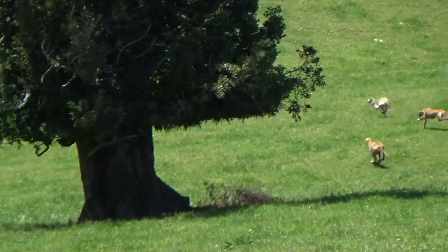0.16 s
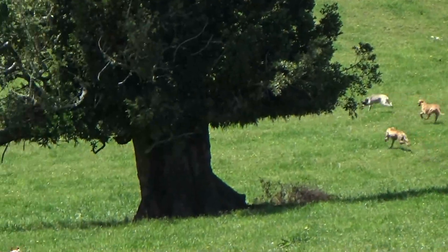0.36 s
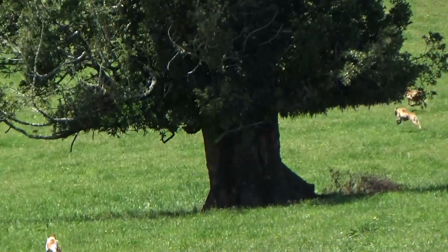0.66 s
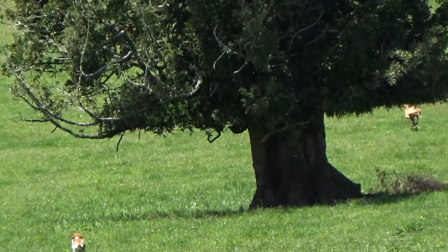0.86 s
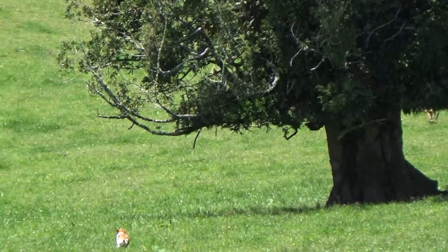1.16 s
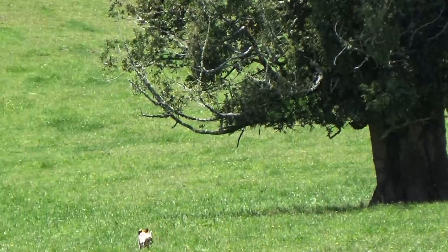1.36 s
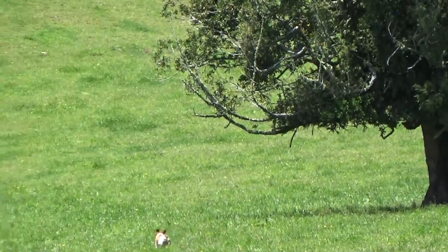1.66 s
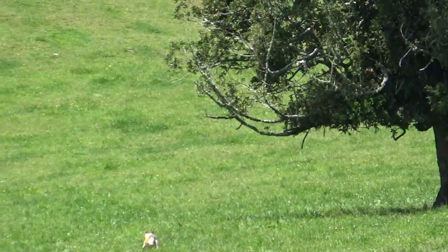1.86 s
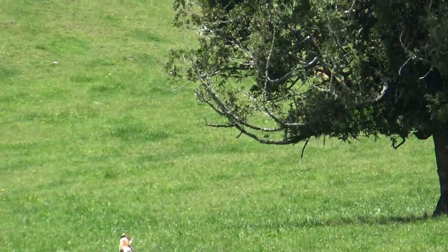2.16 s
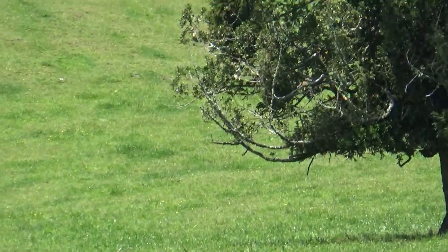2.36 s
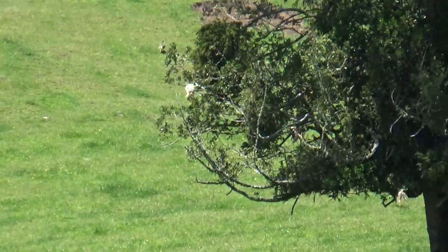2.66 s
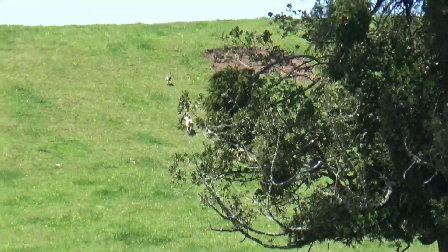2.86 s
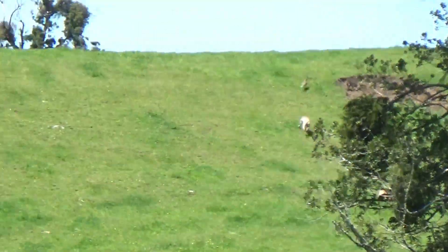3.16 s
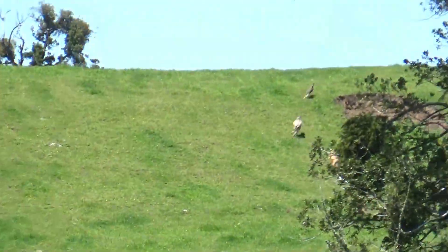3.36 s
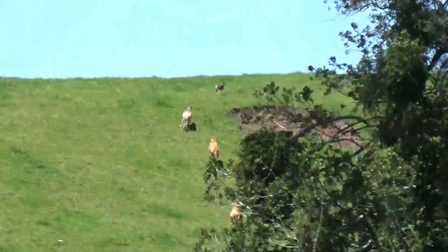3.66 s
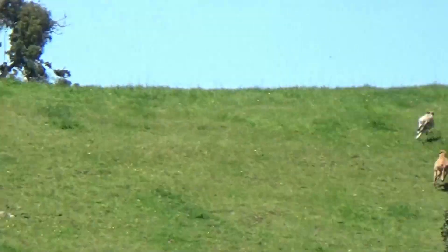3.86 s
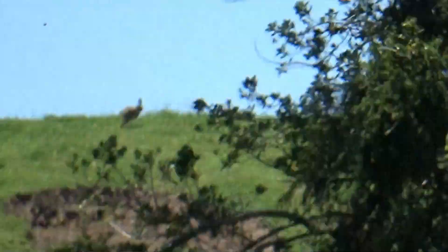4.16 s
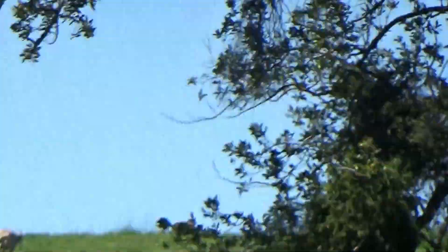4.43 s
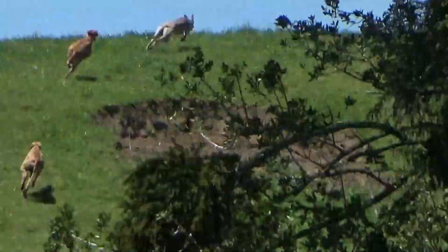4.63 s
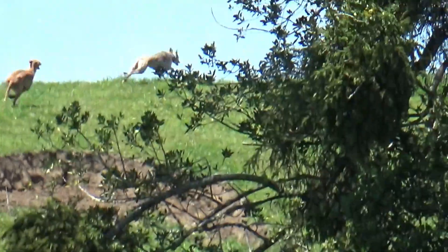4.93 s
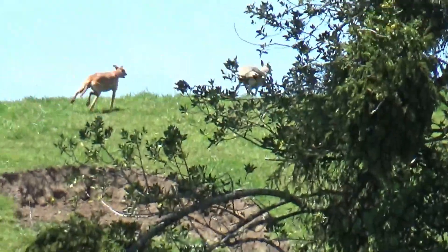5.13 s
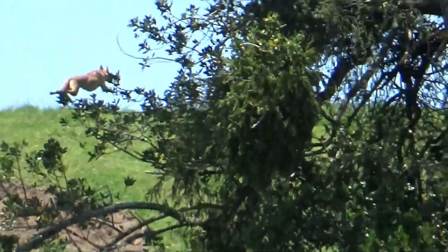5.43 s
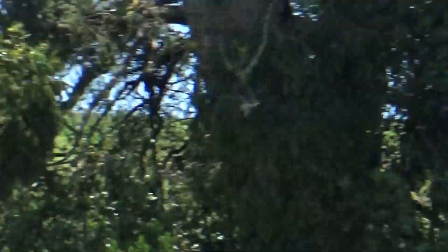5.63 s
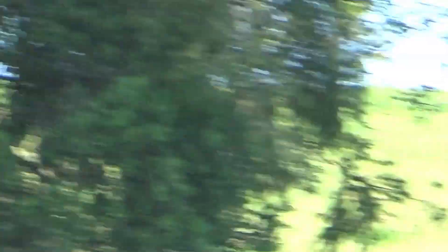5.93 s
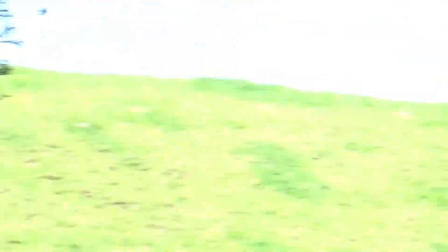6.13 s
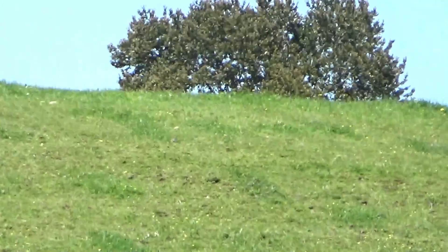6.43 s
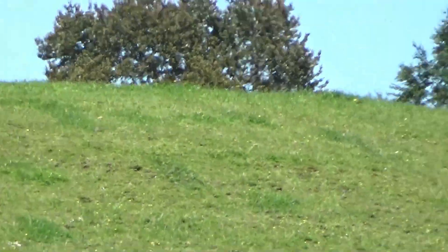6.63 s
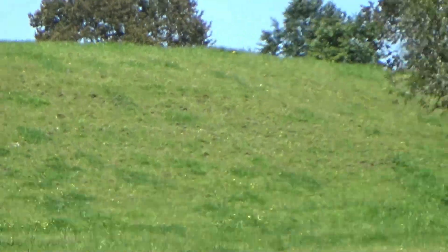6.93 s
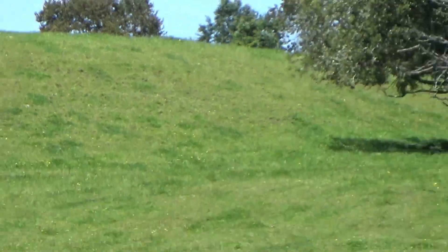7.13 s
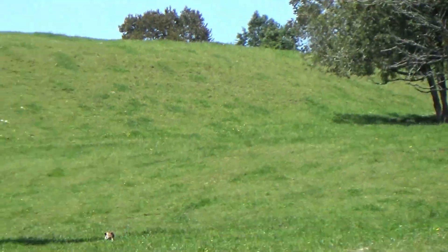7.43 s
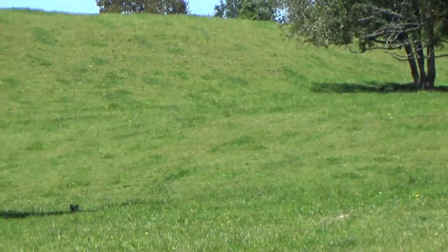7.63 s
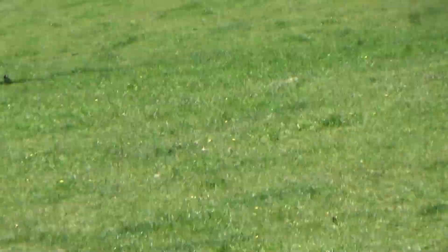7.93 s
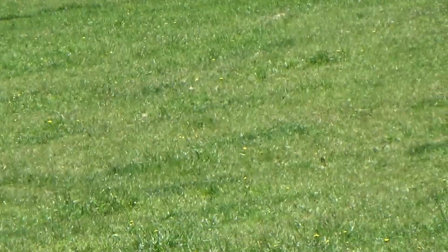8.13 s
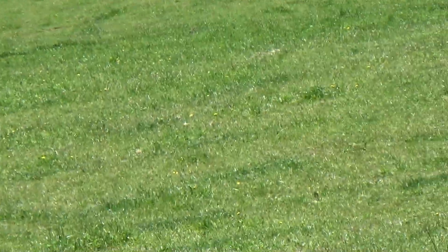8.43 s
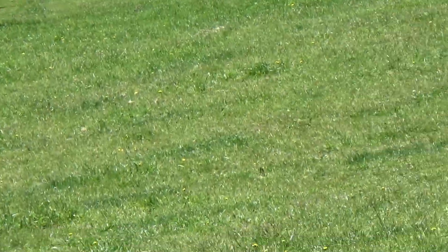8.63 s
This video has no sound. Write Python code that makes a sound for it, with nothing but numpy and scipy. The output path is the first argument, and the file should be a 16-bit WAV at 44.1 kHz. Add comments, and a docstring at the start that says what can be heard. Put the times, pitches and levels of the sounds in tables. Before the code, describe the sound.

A dog to the right whines in thin two-part cries while distant dogs yelp across an open hillside, with light camera handling clicks and cloth rustle.

```python
"""Dogs on a hill pasture, under faint outdoor air that lasts throughout.
At once a near dog, a little to the right, whines in two-part cries built from voice partials, and far dogs
yelp, their calls spread out by trees and slopes. Soon a hand-held camera ticks, as noise bursts ringing its
housing, then cloth brushes it as grainy hiss. The near dog whines again from about 4 s; near 6 s a small bird
chips in sliding whistles; far yelps are strongest just before 8 s and continue almost to the end."""
import sys
import numpy as np
from scipy import signal
from scipy.fft import rfft, irfft, next_fast_len
from scipy.io import wavfile
from scipy.ndimage import uniform_filter1d

SR = 44100
rng = np.random.default_rng(int(sys.argv[2]) if len(sys.argv) > 2 else 0)


def dump(signal):
    """Clip the signal to [-1, 1] and save it as 16-bit WAV at the path in sys.argv[1]."""
    limited = np.clip(np.atleast_2d(signal).T, -1, 1)
    pcm = np.round(limited * 32767).astype(np.int16)
    wavfile.write(sys.argv[1], SR, pcm)


N = 387638
TIME = np.arange(N) / SR
FREQ = np.fft.rfftfreq(N, 1 / SR)


def undb(db):
    """Turn decibels into a multiplying gain."""
    return 10 ** (np.asarray(db) / 20)


def unit(x):
    """Scale to an rms (average strength) of 1."""
    return x / np.sqrt(np.mean(x ** 2))


def at(points, hz, axis=1):
    """Read a table column between its points, along log frequency."""
    table = np.array(points, float)
    return np.interp(np.log(hz + 1), np.log(table[:, 0]), table[:, axis])


def shaped(gain):
    """Noise whose spectrum follows a function of frequency, rms 1."""
    n = next_fast_len(N, real=True)
    spectrum = rfft(rng.standard_normal(n)) * gain(np.fft.rfftfreq(n, 1 / SR))
    return unit(irfft(spectrum, n)[:N])


def noise(spectrum):
    """Noise coloured by a table of frequency and level, rms 1."""
    return shaped(lambda hz: undb(at(spectrum, hz)))


def walk(rate):
    """Smooth random wander, rms 1; a higher rate in Hz wanders faster."""
    return shaped(lambda hz: np.exp(-(hz / rate) ** 2))


def add(out, start, x):
    """Mix a sound in at a time in seconds."""
    i = max(int(start * SR), 0)
    out[i:i + len(x)] += x[:max(N - i, 0)]


def span(start, length, fade):
    """Time within a call, its places in the scene and its soft-edged gate."""
    t = np.arange(0, length, 1 / SR)
    i = np.clip(((start + t) * SR).astype(int), 0, N - 1)
    return t, i, np.clip(np.minimum(t, length - t) / fade, 0, 1)


def harmonics(hz, tract, count):
    """Partials at whole multiples of the pitch, each weighted by the throat's response where it lies."""
    k = np.arange(1, count + 1)[:, None]
    waves = np.sin(k * 2 * np.pi * np.cumsum(hz) / SR)
    return waves * undb(at(tract, k * hz)) * (k * hz < SR / 2)


def late(x, s):
    """The same sound a moment later."""
    return np.interp(TIME - s, TIME, x, left=0)


def absorb(x, edge_hz):
    """Air and grass take the treble from long paths."""
    return irfft(rfft(x) / (1 + (FREQ / edge_hz) ** 4), N)


def scatter(x, t60, delay, apart):
    """Diffuse return from foliage and slopes: a fading noise tail, partly different left and right."""
    t = np.arange(2 * SR) / SR
    envelope = undb(-60 * t / t60) * (1 - np.exp(-(t / delay) ** 2))
    mid, side = rng.standard_normal((2, len(t))) * envelope
    tails = unit(np.array([mid + apart * side, mid - apart * side])) / np.sqrt(len(t))
    return signal.fftconvolve(x[None], tails, axes=1)[:, :N]


# colour of the steady air (f/Hz, relative level/dB)
AIR_COLOUR = [(25, -27), (50, -19), (110, -9), (250, -6), (450, -4), (650, 1), (1000, -1), (1400, -5),
              (2700, -6), (3500, -7), (4500, -12), (9000, -15), (12500, -18), (15800, -23)]
# how alike the air is at left and right (f/Hz, likeness from 0 to 1)
AIR_LIKENESS = [(60, 0.86), (130, 0.9), (300, 0.69), (1400, 0.2), (3100, 0.34), (7000, 0.75), (12000, .98)]
# soft puffs of wind (t/s of the middle, width/s, level/dB)
PUFFS = [(3.717, 0.054, -72), (5.35, 0.064, -72), (5.8, 0.083, -77), (6.865, .04, -74)]
AIR_DB = -61.5  # the part of the air shared by both sides


def air(leaves_db=-72):
    """Steady outdoor noise, far leaves that swell at random, and a few low puffs of wind."""
    likeness = np.clip(at(AIR_LIKENESS, FREQ), 0, 1)
    # an opposite-signed part makes left and right differ
    side = irfft(rfft(noise(AIR_COLOUR)) * np.sqrt((1 - likeness) / (1 + likeness)), N)
    hush = (noise(AIR_COLOUR) + np.array([side, -side])) * undb(AIR_DB)
    swell = undb(2 * walk(3))
    leaf_noise = noise([(300, -62), (650, 10), (1000, 25.5), (2000, 1), (5000, -61)])
    leaves = leaf_noise * undb(leaves_db) * swell
    gusts = sum(undb(db) * np.exp(-((TIME - s) / width) ** 2) for s, width, db in PUFFS)
    wind = noise([(20, -8), (50, -8), (130, -2), (300, -47), (1500, -70)])
    return hush + leaves + gusts * wind


# strokes of a sleeve across the camera (t/s of the firmest moment, swell/s, fade/s, level/dB)
BRUSH_STROKES = [(2.859, 0.039, 0.38, -58), (3.363, 0.034, 0.062, -49), (3.7, 0.11, 0.34, -61),
                 (4.101, 0.058, 0.0077, -46)]
# colour of the cloth (f/Hz, relative level/dB)
CLOTH_COLOUR = [(500, -21), (1500, 4.5), (3000, -1.5), (5000, 0), (7000, 0.5), (9000, 2.5), (11000, -4),
                (15000, -21)]


def brushing(grain_db=3):
    """Each stroke swells and fades; fibres catch and let go, giving a grainy hiss."""
    pressure = np.zeros(N)
    for s, swell, fade, db in BRUSH_STROKES:
        pressure += undb(db) * np.exp(-np.maximum((s - TIME) / swell, (TIME - s) / fade))
    grain = undb(grain_db * walk(600))
    return pressure * unit(noise(CLOTH_COLOUR) * grain)


# ticks of the camera body under the fingers
# (t/s, peak level/dB before the overall gain, bass level/dB and treble level/dB before the colour offsets)
TICKS = [(1.319, -48.5, 11, -13), (2.343, -46.5, -1, -11), (2.394, -33.5, -17, -10.5),
         (3.514, -42.5, 0, -42), (3.653, -36, 0, -4), (3.732, -46, 4, -14), (3.752, -40.5, 1, -13),
         (3.778, -44.5, -5, -29), (3.927, -42.5, -14.5, -17), (4.123, -24, 3.5, -18.5),
         (4.498, -39, 7, -36), (6.611, -34, -6, -18.5), (7.129, -38.5, -4.5, -24), (7.269, -39, -9, -35),
         (7.293, -39, 7, -16), (7.633, -32, 5.5, -2.5), (7.658, -32, -9, -13), (7.673, -31.5, -2.5, -15),
         (7.701, -37.5, 3, -15), (7.729, -39, 4.5, -11), (7.801, -41, 0, -13), (7.816, -42, -3, -14),
         (7.895, -34.5, 5.5, -7.5), (7.904, -36.5, 3, -20), (8.045, -35, -10, -23),
         (8.073, -42.5, 9.5, -14), (8.23, -39, 16, -5)]
# ringing modes of the housing (f/Hz before detuning, time to fall 60 dB t60/s, relative level/dB)
HOUSING_MODES = [(695, 0.081, 2), (980, 0.038, 7), (1490, 0.0075, 16), (1750, 0.046, 15),
                 (2280, 0.011, 15.5), (3270, 0.0096, 19), (4300, 0.0076, 12.5), (6600, 0.0018, 22),
                 (8500, 0.0035, 19.5), (8640, 0.0023, -8.5)]
# colour of a finger's contact (f/Hz, relative level/dB)
CONTACT_COLOUR = [(80, -32), (300, -15), (600, -2), (3500, 2), (5000, 5.5), (9500, 9), (11500, -2),
                  (15000, -11)]


def ticking(push_s=0.0017, gain_db=2, crack_db=0, crack_t60=0.022):
    """Each slip of a finger is a brief scrape that rings the plastic housing."""
    out, t = np.zeros(N), np.arange(4096) / SR
    f = np.fft.rfftfreq(len(t), 1 / SR)
    for s, db, low_db, top_db in TICKS:
        push, crack = rng.standard_normal((2, len(t)))
        # the grip shifts the modes from touch to touch
        detune = 1 + .06 * rng.standard_normal(len(HOUSING_MODES))
        ring = np.zeros(len(t))
        for (hz, t60, mode_db), shift in zip(HOUSING_MODES, detune):
            ring += np.sin(2 * np.pi * hz * shift * t) * undb(mode_db - 60 * t / t60)
        tick = unit(signal.fftconvolve(ring, push * np.exp(-t / push_s))[:len(t)])
        tick = tick + undb(crack_db) * unit(crack * undb(-60 * t / crack_t60))
        # bass and treble vary from touch to touch
        balance = [(1200, low_db - 2.0), (3200, 0), (7500, top_db + 3.5)]
        colour = at(balance, f) + at(CONTACT_COLOUR, f)
        lead = 220  # samples of room before the tick, for the filter's spread
        tick = irfft(rfft(np.roll(tick, lead)) * undb(colour), len(t))
        peak = np.sqrt(uniform_filter1d(tick ** 2, size=88).max())  # loudest 2 ms
        add(out, s - lead / SR, tick / peak * undb(db + gain_db))
    return out


# a small bird's pairs of falling chips, high then low (t/s of the first chip, peak level/dB)
CHIPS = [(6.02, -63), (6.705, -69), (6.77, -63), (6.84, -61), (6.91, -64), (6.98, -65)]
CHIP_HIGH_HZ, CHIP_LOW_HZ, CHIP_GAP_S = 4400, 3400, 0.0386  # starting pitches; gap between starts


def chipping(length_s=0.025, fall=0.074):
    """Pairs of short whistles that slide down by a share of their pitch."""
    out, t = np.zeros(N), np.arange(0, length_s, 1 / SR)
    for s, db in CHIPS:
        for start, hz in (s, CHIP_HIGH_HZ), (s + CHIP_GAP_S, CHIP_LOW_HZ):
            phase = 2 * np.pi * np.cumsum(hz * (1 - fall * t / length_s)) / SR
            add(out, start, np.sin(phase) * np.sin(np.pi * t / length_s) * undb(db))
    return out


CLIMB, CLIMB_CURVE, CLIMB_DB = .16, 2.23, -15  # a yelp starts this share flat and this much softer
SWELL_CURVE = 1.22  # its level rounds off as it nears the break
FALL_CURVE, FALL_DB = 2.2, -14.5  # it holds its top, then drops ever faster in pitch


def arch(t, climb_s, fall_s, low_hz, high_hz, last_hz, low_db, high_db, low_overtones_db, high_overtones_db):
    """Pitch, level and overtones of a yelp: it swells up to the break, shifts, then sinks and fades."""
    early = np.clip(1 - t / climb_s, 0, 1)
    spent = np.clip((t - climb_s) / fall_s, 0, 1)
    broken = uniform_filter1d((t > climb_s) * 1., size=220)
    climbing = low_hz * (1 - CLIMB * early ** CLIMB_CURVE)
    falling = high_hz + (last_hz - high_hz) * spent ** FALL_CURVE
    hz = (1 - broken) * climbing + broken * falling
    db = low_db + (high_db - low_db) * broken + CLIMB_DB * early ** SWELL_CURVE + FALL_DB * spent
    return hz, db, low_overtones_db + (high_overtones_db - low_overtones_db) * broken


# far yelps climb, break (most often upwards) and fall away
# (t/s, climb/s, fall/s, f/Hz before the break, f/Hz after it, last f/Hz, level/dB before, level/dB after,
#  overtone level/dB before, overtone level/dB after); call levels are relative, before the overall gain
YELPS = [ (0, 0.12, .06, 983, 931, 870, -48, -54, 4.5, 2.5),
         (.52, 0.041, 0.04, 955, 960, 940, -66, -74.5, 13, 5),
         (.83, 0.15, 0.1, 970, 1181, 923, -52, -46.5, 6, -7),
         (1.71, 0.043, 0.022, 924, 928, 900, -49, -64.5, -7, 9),
         (1.774, 0.077, 0.089, 942, 1084, 834, -46.5, -48.5, 2, -2.5),
         (2.001, 0.066, 0.14, 915, 920, 878, -72, -74, 13.5, 11),
         (2.245, 0.027, 0.042, 925, 930, 903, -68.5, -63, 4, 1),
         (2.964, 0.058, 0.098, 925, 1152, 743, -51.5, -41.5, 11, 0),
         (3.564, .06, 0.1, 906, 1246, 790, -38, -47.5, -8, -5),
         (5.829, 0.094, 0.2, 1465, 1410, 1280, -57, -56.5, 3, -15),
         (6.179, .07, 0.17, 1540, 1477, 1265, -57, -58, -8, -7),
         (7.446, 0.089, 0.067, 1275, 1574, 1303, -39, -40.5, -4, 0),
         (7.815, .05, .118, 1194, 1647, 978, -31.5, -29, -10.5, -11.5),
         (8.136, 0.04, 0.17, 927, 1215, 1015, -52, -42, 11, -0.5),
         (8.46, 0.048, .04, 820, 816, 780, -60.5, -56, 12, -8)]
# open mouth heard through the distance (f/Hz, relative level/dB)
MOUTH = [(150, -57), (500, -47), (850, 2.5), (1650, -1.5), (2100, -1), (2600, 1), (3300, -11.5),
         (4500, -25.5), (7000, -30.5)]


def yelping(gain_db=2.5, rasp_db=-10.0):
    """Arched voices with a break and some breath noise; the pitch is shakiest as each yelp starts."""
    out, wobble, flutter, rasp = np.zeros(N), walk(230), walk(81), noise(MOUTH)
    for s, climb_s, fall_s, *voicing in YELPS:
        t, i, gate = span(s, climb_s + fall_s, fade=0.0055)
        hz, db, overtones_db = arch(t, climb_s, fall_s, *voicing)
        jitter = .015 + .03 * np.exp(-t / .04)
        partials = harmonics(hz * (1 + jitter * wobble[i]), MOUTH, count=7)
        voice = partials[0] + undb(overtones_db) * partials[1:].sum(0)
        hoarse = undb(rasp_db + overtones_db / 2) * rasp[i]
        add(out, s, (voice + hoarse) * gate * undb(db + gain_db + flutter[i]))
    return out


def place_far_dogs(yelp, hill_s=0.54, hill_db=-21):
    """Far calls arrive directly, through trees, off slopes, and as one dull echo from a hill."""
    trees = undb(-4) * scatter(yelp, t60=0.08, delay=0.0025, apart=0.2)
    slopes = undb(-10.5) * scatter(yelp, t60=2.4, delay=0.068, apart=0.28)
    hill = undb(hill_db) * late(absorb(yelp, edge_hz=2600), hill_s)
    return yelp + trees + slopes + hill


SCOOP, SCOOP_S, SCOOP_DB = 0.0707, 0.01227, -7.5  # a cry starts flat (share of its pitch) and soft
DIP_LEAD_S, DIP_WIDTH_S, DIP_DB = .032, .04, -5.5  # the voice sinks just before it restarts
PINCH_S, PINCH_DB = 0.0081, -4.5  # a brief extra loss of level just before the restart
SAG_DB, HUMP_DB = -1, 1  # the second part loses level overall, with a swell in its middle
DROP_S, DROP_HZ, DROP_DB, DROP_CURVE = .065, 772, -12.5, 1.6  # the end collapses, ever faster


def cry(t, first_s, length, open_hz, dip_hz, restart_hz, sagged_hz, first_db, second_db):
    """Pitch and level of a whine: scoop up, sink, restart higher, sag, collapse."""
    scoop = np.exp(-t / SCOOP_S)
    dip = np.exp(-((t - first_s + DIP_LEAD_S) / DIP_WIDTH_S) ** 2)
    sag = np.clip((t - first_s) / (length - DROP_S - first_s), 0, 1)
    drop = np.clip((t - length + DROP_S) / DROP_S, 0, 1) ** DROP_CURVE
    opening = open_hz * (1 - SCOOP * scoop) + (dip_hz - open_hz) * dip
    held = restart_hz + (sagged_hz - restart_hz) * sag + (DROP_HZ - sagged_hz) * drop
    first = t < first_s
    opening_db = first_db + SCOOP_DB * scoop + DIP_DB * dip
    held_db = second_db + SAG_DB * sag + DROP_DB * drop
    pinch = np.exp(-((t - first_s) / PINCH_S + 1) ** 2)
    db = np.where(first, opening_db, held_db) + HUMP_DB * np.sin(np.pi * sag) + PINCH_DB * pinch
    return uniform_filter1d(np.where(first, opening, held), size=260), uniform_filter1d(db, size=350)


# two-part cries of the near dog
# (t/s, first part/s, whole length/s, opening f/Hz, dip f/Hz, restart f/Hz, sagged f/Hz,
#  first part relative level/dB, second part relative level/dB, final quaver as an rms share of pitch)
WHINES = [ (0, 0.13, 0.35, 1171, 1085, 1106, 1086, -38, -41, 0.044),
          (0.677, .13, 0.37, 1226, 1045, 1185, 1108, -36, -36.5, 0.013),
          (1.342, 0.14, 0.34, 1199, 1087, 1194, 1126, -35.5, -37, 0.017),
          (4.088, .15, 0.4, 1193, 990, 1150, 1064, -42.5, -45, 0.0079),
          (4.764, 0.14, 0.39, 1151, 985, 1151, 1066, -44.5, -45.5, 0.011),
          (5.522, .146, .406, 1132, 990, 1158, 1020, -45.5, -46.5, 0.03),
          (6.322, 0.15, .38, 1141, 1020, 1166, 1053, -45, -45, 0.011),
          (7.117, .13, .355, 1169, 1020, 1115, 1058, -45, -46.5, 0.004)]
# nose and throat of the whining dog (f/Hz, relative level/dB)
NOSE = [(150, -68), (700, -11.5), (1150, -20.5), (1700, -4.5), (2300, -10.5), (2900, -2.5), (3400, -3.5),
        (4000, -8), (4600, -10.5), (5700, -12.5), (7000, -25.5), (8200, -23), (9500, -17), (11500, -32),
        (15000, -51)]
QUAVER_HZ, QUAVER_RISE_S = 29.17, 0.084  # the pitch trembles more and more towards the end
RESTART_CATCH = 0.32  # roughness of the restart, as a share of the opening's


def whining(catch=0.053, catch_s=0.025, shimmer_db=1.77, rasp_db=-27, bright=0.75, usual_db=-39.0):
    """A clean nasal voice, rough as each part starts, with stronger upper partials when louder."""
    out, wobble, flutter, rasp = np.zeros(N), walk(480), walk(154), noise(NOSE)
    waver = .006 * walk(60) + .004 * wobble
    tremble = np.sqrt(2) * np.sin(2 * np.pi * QUAVER_HZ * TIME + walk(14))
    for s, first_s, length, *voicing, quaver in WHINES:
        t, i, gate = span(s, length, fade=0.00043)
        hz, db = cry(t, first_s, length, *voicing)
        caught = np.exp(-t / catch_s) + RESTART_CATCH * np.exp(-np.abs(t - first_s) / catch_s)
        hz = hz * (1 + quaver * tremble[i] * np.exp((t - length) / QUAVER_RISE_S))
        # the voice frays as it runs out
        fray = 1 + 2.5 * np.exp((t - length) / .07)
        hz = hz * (1 + fray * waver[i] + wobble[i] * catch * caught)
        partials = harmonics(hz, NOSE, count=13)
        effort = undb(bright * (db - usual_db))
        voice = partials[:4].sum(0) + effort * partials[4:].sum(0)
        breathy_voice = np.sqrt(2) * voice + undb(rasp_db) * rasp[i]
        add(out, s, breathy_voice * gate * undb(db + shimmer_db * flutter[i]))
    return out


# direction of the near dog (f/Hz, right minus left level/dB, left lead/radians)
WHINE_SIDE = [(690, 18, 0.9), (1190, 13.5, .2), (2280, 7.5, 1.5), (3470, 11, 0.69), (4970, 4.5, 2),
              (5740, -3, 1.2), (8400, -1.5, 0.55), (15000, 2, 0)]


def place_near_dog(whine, echo_s=0.063, echo_db=-19, ground_db=-12):
    """Side-to-side level and phase place the dog; ground bounce, one echo and a diffuse tail follow."""
    # the bounce shifts as the dog moves its head, so the partials trade strength
    whine = whine + undb(ground_db) * late(whine, 0.001675 + 0.0001 * walk(8.4))
    # half of each difference goes to either side
    turn = undb(at(WHINE_SIDE, FREQ) / 2) * np.exp(-.5j * at(WHINE_SIDE, FREQ, axis=2))
    direct = irfft(rfft(whine) * np.array([1 / turn, turn]), N)
    dull = absorb(whine, edge_hz=8900)
    echo = undb(echo_db) * late(dull, echo_s)
    tail = undb(-19.5) * scatter(dull, t60=2.8, delay=0.017, apart=0.56)
    return direct + echo + tail


def scene():
    """The near dog to one side, the far dogs ahead, handling at the camera itself."""
    background = air() + brushing() + ticking() + chipping()
    return background + place_far_dogs(yelping()) + place_near_dog(whining())


TOP_HZ = 15800


def record(dry):
    """The camera cuts the top with a steep low-pass filter."""
    return signal.sosfilt(signal.ellip(10, .2, 70, TOP_HZ, fs=SR, output="sos"), dry)


dry = scene()
out = record(dry)
dump(out)
```